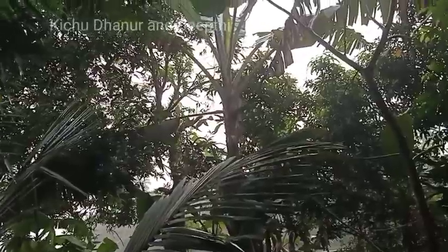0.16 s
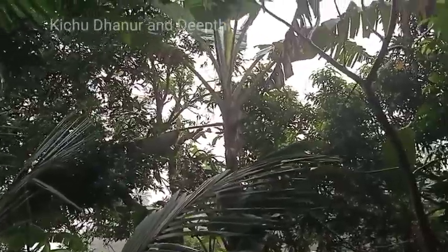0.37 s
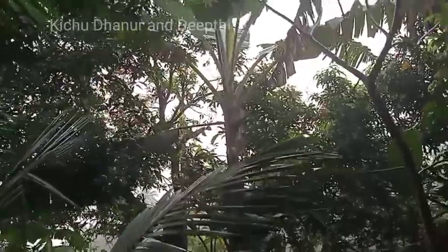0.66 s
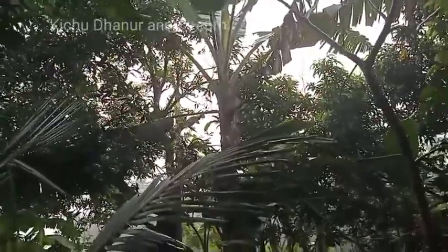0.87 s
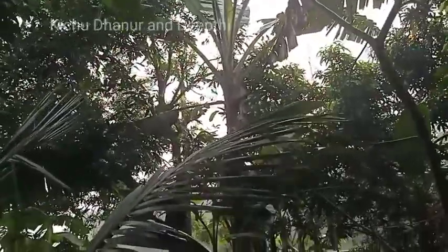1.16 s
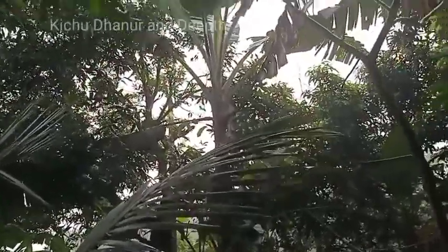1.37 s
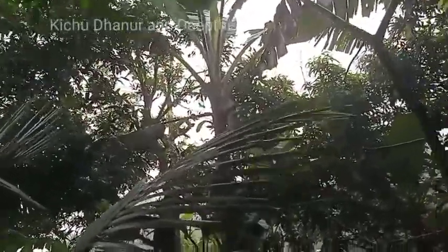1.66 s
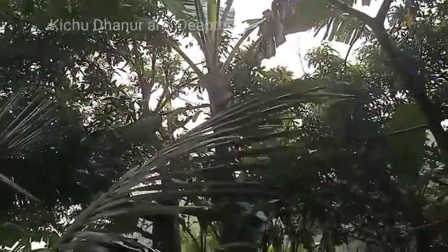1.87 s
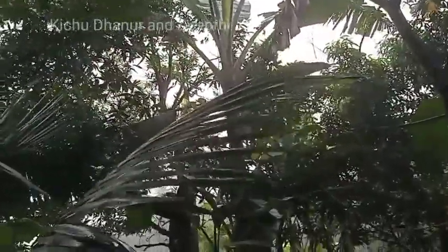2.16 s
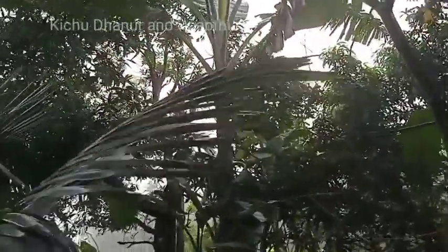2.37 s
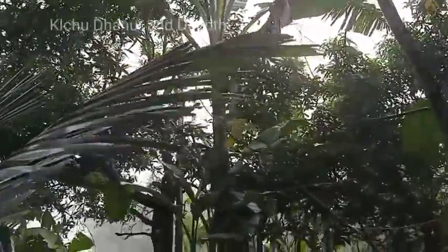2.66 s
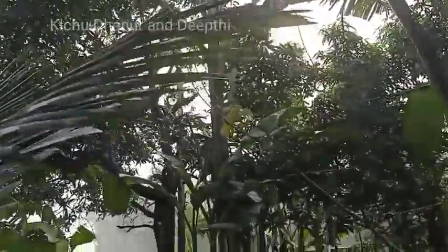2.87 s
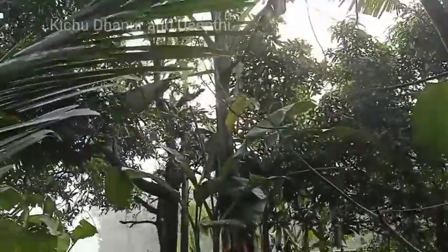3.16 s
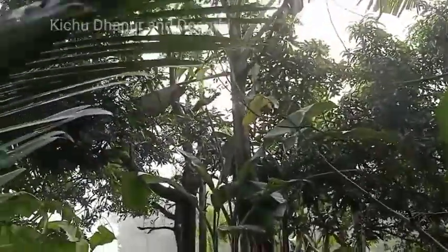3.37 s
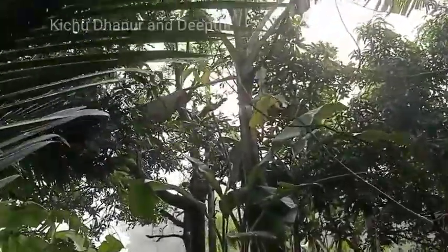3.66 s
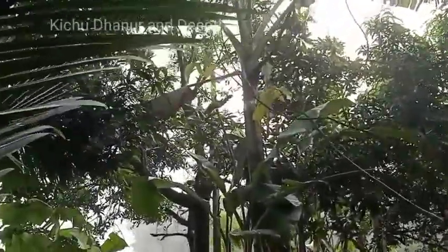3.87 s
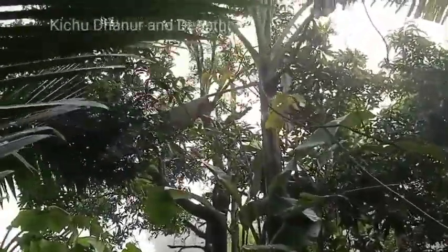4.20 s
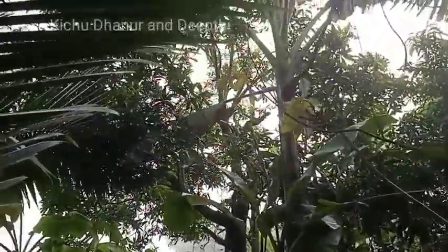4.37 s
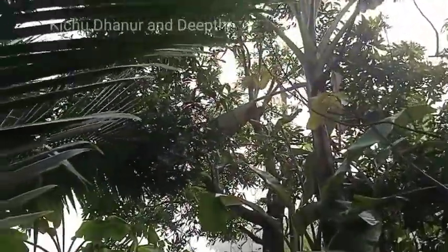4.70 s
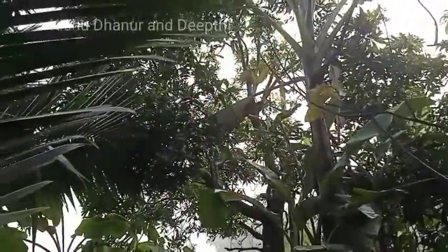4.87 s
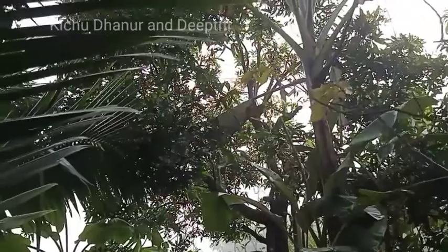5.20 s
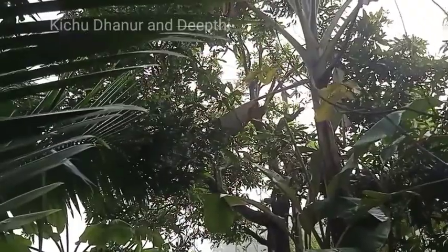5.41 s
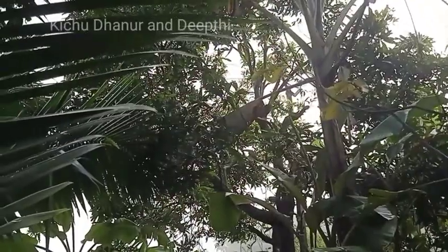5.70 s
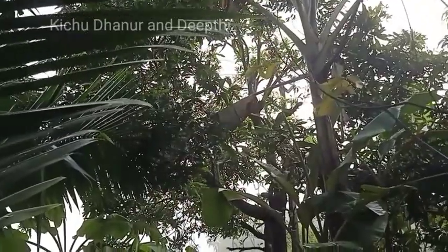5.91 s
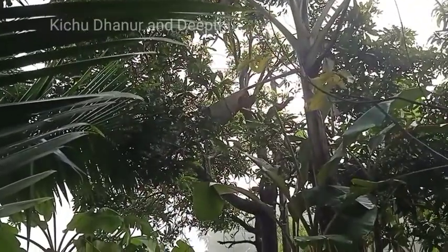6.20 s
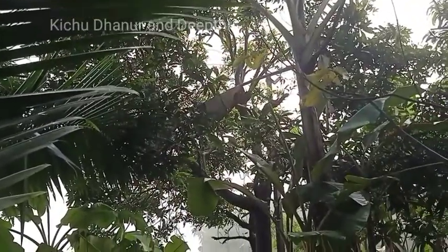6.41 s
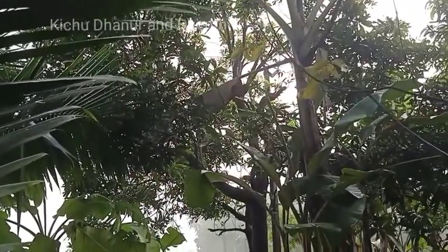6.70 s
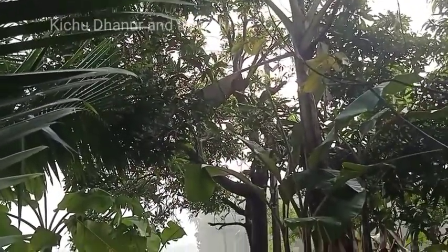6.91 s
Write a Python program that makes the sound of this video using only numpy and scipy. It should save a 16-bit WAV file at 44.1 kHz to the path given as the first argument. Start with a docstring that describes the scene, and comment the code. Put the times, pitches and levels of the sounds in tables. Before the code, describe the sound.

From the start a near bird repeats a bright, quick upward tweet of about a tenth of a second, with a strong octave, roughly every half second to the end. Hoarse scolds rasp at 0.2, 0.75 to 1.8, 2.6 to 3.0 and 3.7 seconds, then cluster from 4.2 to 5.6. Small falling chips and peeps open the scene; thin whistles flick by throughout, and distant tweets answer. A faint engine drone peaks near 1.1, with a brief nasal honk. Background twitter nearly vanishes near 2.3, then returns. Dry bill snaps click at 2.3 and 3.3. A growly nasal wail climbs at 4.4 to 4.6; stronger wavering ones fill 5.5 to 6.55. Rough scolding follows to 7.0, with another honk at 6.95. Soft low rumble and leafy hush lie underneath, with scattered woodland echoes in wide stereo.

```python
"""A garden with birds in its trees. A near bird repeats a rising, two-toned tweet about twice a second, built from
harmonics on a sliding pitch. Others scold with hoarse pulse trains or draw out a nasal wail, both through resonant
throats; slurred whistles, honks, faint twitter and ringing bill snaps come from all round.
Leaves and trunks scatter every call as decaying random echoes, over a floor of coloured noise
with a distant engine's drone."""
import sys
import numpy as np
from scipy import signal
from scipy.fft import rfft, irfft, next_fast_len
from scipy.io import wavfile
from scipy.ndimage import uniform_filter1d

SR = 44100
rng = np.random.default_rng(int(sys.argv[2]) if len(sys.argv) > 2 else 0)


def output_pcm(signal):
    """Save a mono or channel-first signal as 16-bit PCM at the path in sys.argv[1].

    Samples are clipped to [-1, 1] before scaling.
    """
    pcm = np.clip(np.atleast_2d(signal).T, -1, 1) * 32767
    wavfile.write(sys.argv[1], SR, np.round(pcm).astype(np.int16))


N = 310905
TIME = np.arange(N) / SR  # seconds


def from_db(db):
    """Level is logarithmic: 20 dB is a tenfold amplitude."""
    return 10 ** (np.asarray(db) / 20)


def rms_one(x):
    """Mean power sets the level: scale a signal to rms 1."""
    return x / np.sqrt(np.mean(x ** 2) + 1e-20)


def at_hz(points, hz):
    """Frequency is read logarithmically, as pitch is: interpolate a (Hz, value) curve."""
    knots, values = np.transpose(points)
    return np.interp(np.log(hz + 1), np.log(knots), values)


def in_time(rows):
    """A contour is piecewise linear in time: return its columns, then a gate with 20 ms ramps outside its ends."""
    s, *columns = np.transpose(rows)
    gate = np.clip(np.minimum(TIME - s[0], s[-1] - TIME) / .02 + 1, 0, 1)
    return [np.interp(TIME, s, c) for c in columns] + [gate]


def drift(rate, size=N):
    """Slow random modulation: normal values, `rate` a second, joined by straight lines; spread about 1."""
    knots = rng.standard_normal(size // 8 + 4)
    position = np.arange(size) * min(rate / SR, 1 / 8)
    return np.interp(position, np.arange(len(knots)), knots)


def colour(x, spectrum):
    """Linear filtering multiplies spectra: shape a sound by a (Hz, dB) curve, at rms 1."""
    size = next_fast_len(N)
    gain = from_db(at_hz(spectrum, np.fft.rfftfreq(size, 1 / SR)))
    return rms_one(irfft(rfft(x, size) * gain, size)[..., :N])


def throat(x, resonances):
    """Source and filter: parallel (Hz, width Hz, dB) resonances, each applied twice for steep skirts."""
    out = 0
    for hz, width, db in resonances:
        r = np.exp(-np.pi * width / SR)  # pole radius: a wider resonance rings more briefly
        section = [(1 - r * r) / 2, 0, (r * r - 1) / 2, 1, -2 * r * np.cos(2 * np.pi * hz / SR), r * r]
        out = out + from_db(db) * signal.sosfilt([section, section], x)
    return out


def add(track, s, sound):
    """Superposition: mix a sound into a track at a time in seconds, trimmed to the track."""
    start = int(s * SR)
    sound, start = sound[max(-start, 0):], max(start, 0)
    track[start:start + len(sound)] += sound[:max(N - start, 0)]


def note(hz, harmonics_db, waver, attack, release):
    """A syrinx tone is a sum of harmonics of one moving pitch; attack and release are shares of its length."""
    u = np.linspace(0, 1, len(hz))
    wavering_hz = hz * (1 + waver * drift(382, size=len(hz)))
    phase = 2 * np.pi * np.cumsum(wavering_hz) / SR
    swell = np.sin(np.pi / 2 * np.clip(np.minimum(u / attack, (1 - u) / release), 0, 1))
    tone = sum(from_db(db) * np.sin(k * phase) for k, db in harmonics_db)
    return np.sqrt(2) * swell * tone  # a harmonic's dB is its rms at full swell


def arc(length, start_hz, end_hz):
    """A glide in pitch: a rising slur levels off early at its final pitch; a falling one drops almost straight."""
    ease = 2.8 if end_hz > start_hz else 1.1
    return end_hz + (start_hz - end_hz) * np.linspace(1, 0, int(length * SR)) ** ease


def garden(x, scatter_db, tail_db, pan_db):
    """Multiple scattering: direct sound, quick echoes off near foliage, a tail from far trees; power is kept."""
    scatter_t60_s, garden_t60_s = 0.17, 0.57
    right_lag_s = .00007  # the direct sound reaches the right channel slightly later
    t = TIME[:SR]
    sparse = (rng.random((2, 2, SR)) < 3000 / SR) * (t > .002)  # 3000 echoes a second, after 2 ms
    echoes = rng.standard_normal((2, 2, SR)) * sparse
    near = rms_one(echoes[0] * from_db(-60 * t / scatter_t60_s))
    far = rms_one(echoes[1] * from_db(-60 * t / garden_t60_s) * (1 - np.exp(-t / 0.0031)))
    paths = (from_db(scatter_db) * near + from_db(tail_db) * far) / np.sqrt(SR)
    paths[0, 0] = paths[1, int(right_lag_s * SR)] = 1  # direct sound, left and right
    # Open air favours no pitch: flatten the response until only a fine ripple remains.
    response = rfft(paths)
    response /= np.sqrt(uniform_filter1d(abs(response) ** 2, size=90))
    paths = irfft(response)[:, :SR * 3 // 4]
    sides = from_db([[pan_db / 2], [-pan_db / 2]])  # a positive pan leans left
    return signal.fftconvolve(x[None], paths, axes=1)[:, :N] * sides


def tweet_pitch(length, start_hz, top_hz):
    """Exponential approach to a target: the pitch slides up, quivers, and sags as the beak closes."""
    scoop_s, sag_hz, quiver_hz = 0.01907, 46.5, 19.75
    t = np.arange(int(length * SR)) / SR
    scoop = (start_hz - top_hz) * np.exp(-t / scoop_s)
    sag = sag_hz * (t / length) ** 6
    return top_hz + scoop - sag + quiver_hz * drift(70.6, size=len(t))


def near_bird():
    """Directivity: odd and even harmonics beam differently from the beak, the octave to the right."""
    # The near bird's tweets. Each row: start in seconds, fundamental in dB, octave in dB, before scattering.
    tweets = [(-.08, -48, -40.5), (0.248, -36, -34), (0.66, -35, -33.5), (1.122, -38.5, -33),
              (1.553, -40, -34.5), (2.071, -37.5, -33), (2.583, -37, -36), (3.099, -36.5, -35),
              (3.633, -37.5, -34.5), (4.152, -38.5, -35), (4.641, -36.5, -35), (5.169, -37, -35),
              (5.655, -38.5, -33.5), (6.107, -36.5, -32.5), (6.498, -36, -32)]
    # A hurried tweet is longer and scoops up from lower: time since the last (s), length (s), starting pitch (Hz).
    hurried, rested = (.41, 0.0988, 3050), (.52, 0.0903, 3220)
    rests, lengths, starts_hz = np.transpose([hurried, rested])
    top_hz = 3359
    pip_s, pip_lead_s, pip_hz, pip_db = 0.016, .008, (2480, 2740), -44  # a low pip leads in each tweet
    odd, even = np.zeros((2, N))
    last = -np.inf
    for s, first_db, octave_db in tweets:
        rest, last = s - last, s
        length = np.interp(rest, rests, lengths)
        hz = tweet_pitch(length, np.interp(rest, rests, starts_hz), top_hz)
        pip_harmonics = [(1, pip_db), (2, pip_db - 8)]
        pip = note(arc(pip_s, *pip_hz), pip_harmonics, waver=0, attack=0.25, release=0.83)
        add(odd, s - pip_lead_s, pip)
        odd_harmonics = [(1, first_db), (3, first_db - 21.0)]
        add(odd, s, note(hz, odd_harmonics, waver=0.003, attack=0.17, release=0.2))
        even_harmonics = [(2, octave_db), (4, octave_db - 30.0)]
        add(even, s, note(hz, even_harmonics, waver=0.003, attack=0.24, release=0.05))
    left_leaning = garden(odd, scatter_db=4.0, tail_db=0, pan_db=6.0)
    right_leaning = garden(even, scatter_db=8.5, tail_db=1.5, pan_db=-9.0)
    return left_leaning + right_leaning


def scolding(flutter_db=3.0, throb_db=2.5):
    """Source and filter: a buzz rings the throat, shakier and breathier when hoarse; an open beak lets hiss out."""
    # Hoarse scolding calls. Each row: start in seconds, length in seconds, pitch in Hz,
    # hoarseness (held within 0-1), throat level in dB, hiss level in dB before a further 10 dB.
    rasps = [(0.201, .085, 507.5, 0.9, -46.5, -77), (0.748, 0.23, 510.5, 0.52, -49.5, -66.5),
             (0.958, 0.17, 583, 0.89, -45, -55), (1.331, 0.18, 442.3, 1, -49.5, -69),
             (1.53, .29, 561, 0.94, -51, -64), (2.624, 0.42, 519.6, 1.06, -49, -62),
             (3.708, 0.075, 487, 1.1, -47, -58.5), (4.221, 0.52, 521.6, 0.99, -48, -63.5),
             (4.273, 0.041, 539, 0.89, -41, -90), (4.598, 0.13, 567, 1.08, -40, -56),
             (4.732, 0.064, 513, 0.15, -46, -79), (5.184, 0.069, 510.6, 1.1, -47.5, -89),
             (5.52, 0.11, 579, .8, -45.5, -65), (6.551, 0.2, 439.3, 0.89, -48.5, -67),
             (6.72, 0.33, 434, .85, -48.5, -59.5)]
    # Throat resonances. Each row: centre in Hz, width in Hz, relative gain in dB.
    scold_throat = [(1710, 160, -20), (2120, 690, 15), (2544, 870, 16.5), (3930, 2600, -30)]
    # Open-beak hiss. Each row: frequency in Hz, relative spectrum level in dB per Hz.
    hiss_spectrum = [(250, -40), (600, -8), (4200, 5.5), (5300, -2), (8800, 1.5), (10000, -7), (12700, -25)]
    jitter, wander, breath, arch = .024, .06, .42, .08  # shares of pitch, except breath: noise against buzz
    attack_s, release_s = 0.012, 0.025
    waver = jitter * drift(500) + wander * drift(55)
    flutter = from_db(flutter_db * drift(160) + throb_db * drift(45))
    noise = rng.standard_normal(N)
    rush = colour(rng.standard_normal(N), hiss_spectrum)
    low, high = np.zeros((2, N))
    for s, length, pitch_hz, hoarse, throat_db, hiss_db in rasps:
        part = np.arange(int(s * SR), min(int((s + length) * SR), N))
        t, hoarse = TIME[:len(part)], np.clip(hoarse, 0, 1)
        gape = np.sin(np.pi * t / length)  # beak opening peaks mid-call and lifts the pitch
        bend = hoarse * (arch * (gape - .5) + waver[part])
        cycles = np.cumsum(pitch_hz * (1 + bend)) / SR
        pulses = rms_one(sum(np.cos(2 * np.pi * k * cycles) for k in range(1, 19)))
        puffs = np.exp(-3 * (cycles % 1))  # a burst of air dies away in each cycle
        edges = np.clip(np.minimum(t / attack_s, (length - t) / release_s), 0, 1)
        swell = flutter[part] ** hoarse * np.sin(np.pi / 2 * edges)
        breathy = breath * hoarse * rms_one(puffs * noise[part])
        body = throat(pulses + breathy, scold_throat)
        add(low, s, from_db(throat_db) * rms_one(swell * body))
        add(high, s, from_db(hiss_db + 10.0) * rms_one(swell * gape * puffs * rush[part]))
    voiced = garden(low, scatter_db=-3.0, tail_db=-3.0, pan_db=-4.0)
    hissed = garden(high, scatter_db=4.0, tail_db=5.0, pan_db=1.0)
    return voiced + hissed


def wail(rolloff=0.4, count=12):
    """Formants: harmonics sweep through a fixed throat; low notes break into a growl at half the pitch."""
    # One curve for each syllable. Each row: time in seconds, pitch in Hz, short-term level in dB before scattering.
    syllables = [
        [(4.36, 560, -65), (4.47, 636, -42.5), (4.56, 693, -46), (4.63, 801, -38.5)],
        [(5.47, 700, -47.5), (5.51, 795, -40), (5.545, 618, -51), (5.595, 657, -54), (5.637, 792, -36.5),
         (5.785, 816.6, -36.5), (5.862, 710, -43), (5.99, 604, -50.5)],
        [(6.025, 612.4, -42.5), (6.11, 736, -34.5), (6.17, 674, -41.5), (6.25, 717, -36.5), (6.272, 756, -37.5),
         (6.505, 795, -41), (6.555, 727, -44)],
    ]
    # Throat resonances. Each row: centre in Hz, width in Hz, relative gain in dB.
    wail_throat = [(1575, 88, -12.5), (2246, 574, 5), (2910, 380, -3), (8810, 1140, -12)]
    # Roughness against pitch. Each row: pitch in Hz, hoarseness from 0 to 1.
    hoarse_by_pitch = [(610, .75), (770, .22)]
    jitter, breath, growl = .028, .42, .8  # shares of pitch, noise and amplitude at full hoarseness
    out = np.zeros(N)
    for syllable in syllables:
        hz, db, gate = in_time(syllable)
        hoarse = np.clip(at_hz(hoarse_by_pitch, hz), 0, 1)
        phase = 2 * np.pi * np.cumsum(hz * (1 + jitter * hoarse * drift(250))) / SR
        voice = rms_one(sum(np.cos(k * phase) / k ** rolloff for k in range(1, count + 1)))
        voice = voice * (1 + growl * hoarse * drift(70) * np.cos(phase / 2))  # alternate cycles differ
        cry = throat(voice + breath * hoarse * rng.standard_normal(N), wail_throat)
        running_rms = np.sqrt(uniform_filter1d(cry ** 2, size=1000) + 1e-12)
        out += gate * from_db(db) * cry / running_rms
    return garden(out, scatter_db=1, tail_db=-2, pan_db=-2.0)


def honk():
    """A missing fundamental sounds nasal: cries made only of upper harmonics, and one low falling chuck."""
    # Brief nasal cries. Each row: start in seconds, second-harmonic level in dB before scattering.
    honks = [(1.065, -43), (6.945, -36.5)]
    # Harmonics from the second upwards: each entry is a relative level in dB.
    upper_harmonics = [0, -1, -13.5, -7.5, -11.5]
    out = np.zeros(N)
    for s, db in honks:
        hz = arc(0.042, 1181, 1191)
        cry = note(hz, enumerate(upper_harmonics, 2), waver=0.01, attack=0.16, release=0.56)
        add(out, s, from_db(db) * cry)
    chuck = note(arc(0.027, 1337.7, 646.1), [(1, -53.5)], waver=0.0285, attack=0.18, release=0.29)
    add(out, 6.588, chuck)
    return garden(out, scatter_db=-0.5, tail_db=-9.0, pan_db=-3.0)


def small_birds():
    """Frequency glides of nearly pure tone: slurred whistles, each sliding into its final pitch."""
    # Each row: start in seconds, length in seconds, final pitch in Hz,
    # slide into it in semitones (positive rises), fundamental level in dB before scattering.
    whistles = [(-.03, 0.088, 4690, 1, -48.5), (0.836, .1, 2074, 1, -51), (1.136, 0.088, 6800, -2.5, -47),
                (2.18, 0.04, 2504, -1, -56), (2.35, .06, 5060, 0.6, -52.5), (2.384, 0.04, 7010, 0, -49.5),
                (2.528, 0.038, 2970, 1, -48), (2.746, 0.053, 3870, 1.5, -41),
                (3.284, 0.046, 4490, 1.5, -47), (3.509, 0.043, 3795, -1.5, -52.5),
                (4.104, .11, 3900, 4.5, -51.5), (4.333, .1, 4590, 4.5, -50),
                (4.842, 0.093, 2740, -8, -56.5), (5.377, 0.093, 4744, 1, -43.5),
                (5.968, 0.056, 4660, 4, -44.5), (6.363, 0.087, 4430, 0.2, -50),
                (6.716, 0.048, 4690, 0.5, -49.5)]
    out = np.zeros(N)
    for s, length, end_hz, slide, db in whistles:
        hz = arc(length, end_hz * 2 ** (-slide / 12), end_hz)
        add(out, s, note(hz, [(1, db), (2, db - 12.5)], waver=0.012, attack=0.17, release=0.069))
    return garden(out, scatter_db=2.0, tail_db=0.5, pan_db=-0.5)


def chips():
    """Downward glides: two small birds repeat falling notes, one steep high chips, the other lower peeps."""
    # Steep falling chips, all alike: each entry is a start in seconds.
    chip_starts = [0.049, 5.376, 5.529, 5.645, 6.149]
    # Short falling peeps of another bird, all alike: each entry is a start in seconds.
    peep_starts = [.112, 0.471, 2.879, 2.953]
    # Each bird: starts, length in seconds, (from, to) pitch in Hz, level in dB before scattering.
    birds = [(chip_starts, .028, (4890, 3880), -51.5), (peep_starts, 0.0465, (3070, 2550), -46)]
    out = np.zeros(N)
    for starts, length, fall_hz, db in birds:
        harmonics = [(1, db), (2, db - 21.0)]
        for s in starts:
            add(out, s, note(arc(length, *fall_hz), harmonics, waver=0.0056, attack=0.17, release=0.095))
    return garden(out, scatter_db=-4.5, tail_db=3.0, pan_db=-1.5)


def bill_snaps():
    """Impulse response: dry clicks ring the beak's broad resonance for a millisecond or two."""
    # Each row: start in seconds, level in dB (the click that drives the beak is 25 dB higher).
    snaps = [(2.296, -41), (3.285, -39.5), (3.353, -33.5)]
    clicks = np.zeros(N)
    for s, db in snaps:
        add(clicks, s, from_db([db + 25.0]))
    ringing = throat(clicks, [(1950, 1200, 0.0028)])
    return garden(ringing, scatter_db=-7.0, tail_db=-30, pan_db=-6)


def far_bird():
    """Reverberation outweighs direct sound at a distance: the same kind of tweet from deep in the trees."""
    # Far birds of the near one's kind answer. Each row: start in seconds, top pitch in Hz,
    # fundamental level in dB before scattering.
    replies = [(.02, 3220, -52), (0.52, 3230, -55), (2, 3175, -54), (2.574, 2890, -53),
               (3.109, 2940, -48.5), (3.56, 3260, -50), (3.89, 3303, -50.5), (4.94, 3300, -53)]
    out = np.zeros(N)
    for s, top_hz, db in replies:
        hz = tweet_pitch(.085, .965 * top_hz, top_hz)
        harmonics = [(1, db), (2, db + 0.5), (3, db - 19.0)]
        add(out, s, note(hz, harmonics, waver=0.0132, attack=0.069, release=0.19))
    return garden(out, scatter_db=-9.0, tail_db=11.0, pan_db=-4.0)


def twitter(count=40, pitch_hz=2720, level_db=0, octave_db=-16):
    """Incoherent sum of many distant birds: faint slurs scattered in time, in a chorus that swells and thins."""
    # Gain of the distant chorus. Each row: time in seconds, gain in dB.
    chorus_curve = [(1.1, -49), (2.3, -84), (2.8, -48), (5.2, -49), (7.05, -47)]
    out = np.zeros(N)
    for k, (when, length, start, end, loud) in enumerate(rng.uniform(-1.2, 1, (count, 5))):
        hz = arc(.06 + .025 * length, pitch_hz * (1 + .14 * start), pitch_hz * (1 + .1 * end))
        slur = note(hz, [(1, 0), (2, octave_db)], waver=.018, attack=.3, release=.3)
        s = (k + .5 + when / 2) * N / SR / count  # evenly spaced, then shifted by chance
        add(out, s, from_db(level_db + 2 * loud) * slur)
    chorus_db, _ = in_time(chorus_curve)
    return garden(from_db(chorus_db) * out, scatter_db=2, tail_db=1, pan_db=0)


def outdoors():
    """Diffuse-field coherence: far rumble and leaf hush alike in both ears only in the bass, and an engine whine."""
    # Outdoor floor. Each row: frequency in Hz, relative spectrum level in dB per Hz.
    air_spectrum = [(30, -35), (62, 2.5), (135, 1.5), (280, -5.5), (1250, -9), (2600, -1), (4300, -17),
                    (8000, -15), (14000, -29.5)]
    # Left-right likeness that shapes mid and side before each is levelled. Each row: frequency in Hz, likeness 0-1.
    likeness = [(100, 0.96), (350, 0.61), (3000, 0.22)]
    # A distant engine drones. Each row: time in seconds, peak level in dB.
    drone_curve = [(0, -72.5), (1.1, -62), (1.7, -80)]
    mid, side = rng.standard_normal((2, N))
    mid_spectrum = [(hz, 10 * np.log10(1 + abs(c))) for hz, c in likeness]
    side_spectrum = [(hz, 10 * np.log10(max(1 - c, 1e-2))) for hz, c in likeness]
    mid, side = colour(mid, mid_spectrum), colour(side, side_spectrum)
    air = from_db(-58.0) * colour(np.array([mid + side, mid - side]), air_spectrum)
    db, gate = in_time(drone_curve)
    whine = np.sin(2 * np.pi * np.cumsum(588 + 16 * drift(40.83)) / SR)  # Hz, wandering
    return air + gate * from_db(db) * whine


def scene():
    """Superposition of all the birds over the outdoor floor."""
    calls = near_bird() + scolding() + wail() + honk()
    small = small_birds() + chips() + bill_snaps()
    distant = far_bird() + twitter() + twitter(count=45, pitch_hz=4510, level_db=-9.5)
    return calls + small + distant + outdoors()


def record(dry):
    """Band limiting: a steep elliptic low-pass cuts the top above 15.5 kHz."""
    cutoff_hz = 15500
    return signal.sosfilt(signal.ellip(12, .1, 80, cutoff_hz, fs=SR, output="sos"), dry)


dry = scene()
out = record(dry)
output_pcm(out)
```